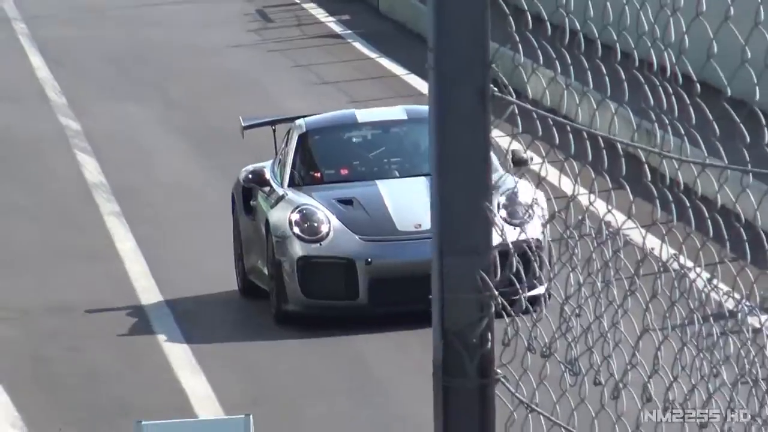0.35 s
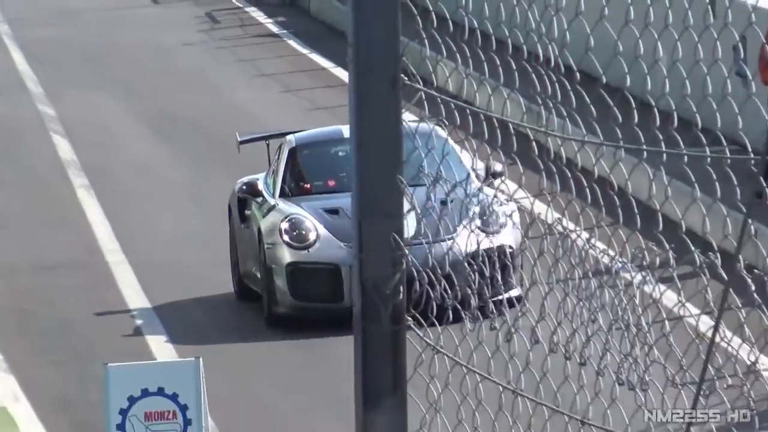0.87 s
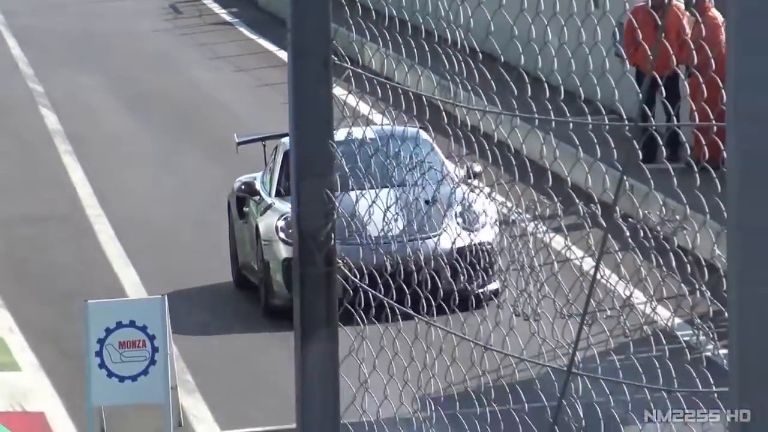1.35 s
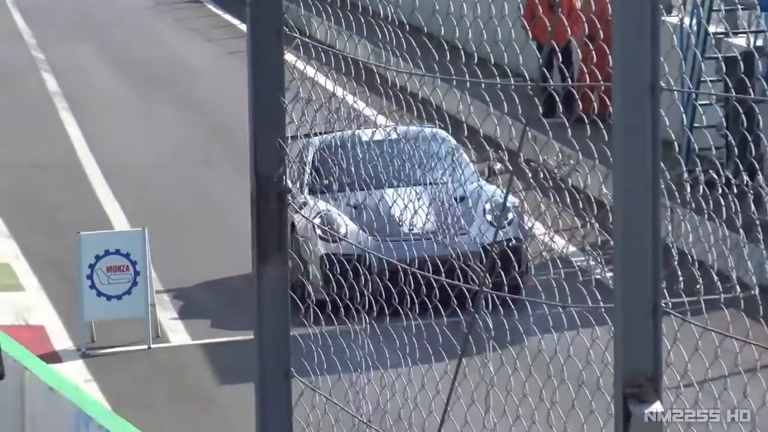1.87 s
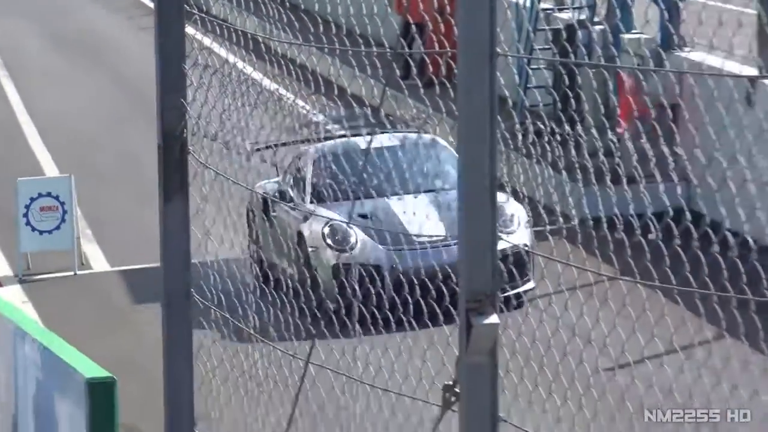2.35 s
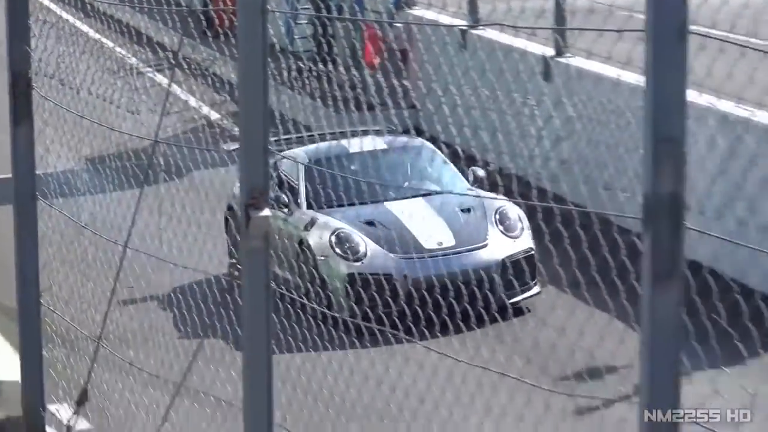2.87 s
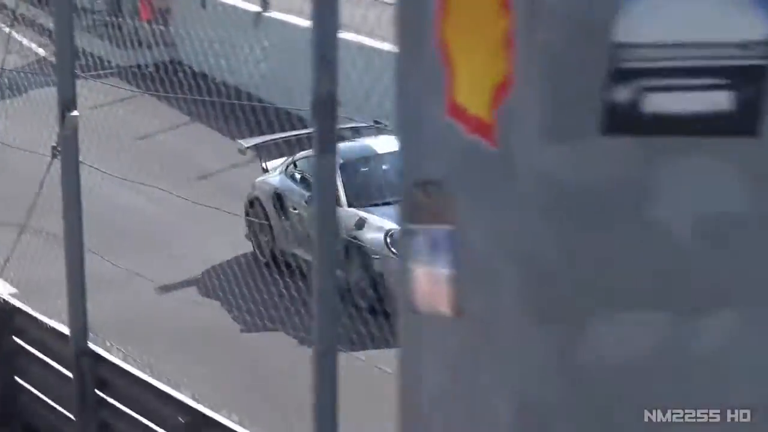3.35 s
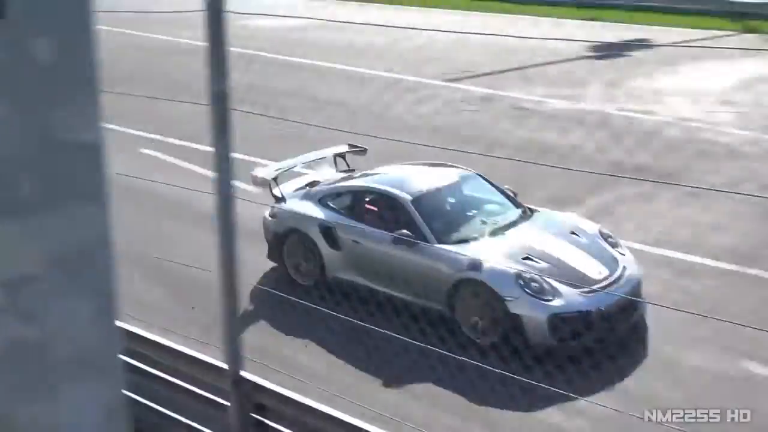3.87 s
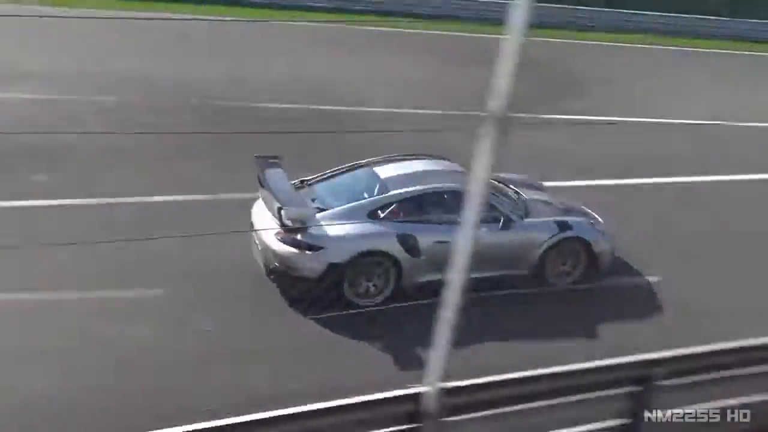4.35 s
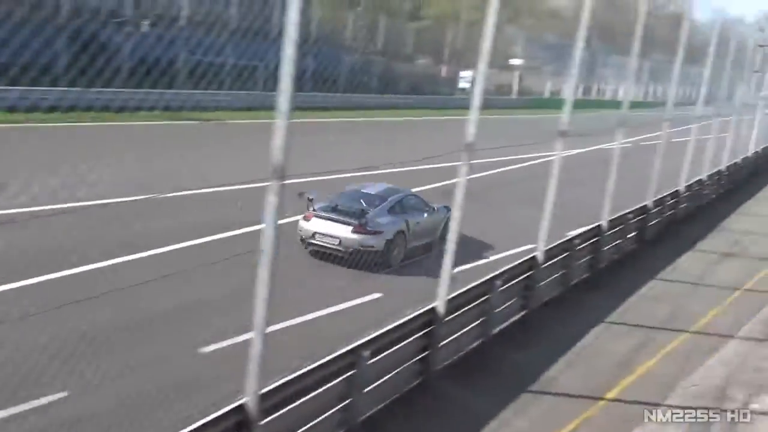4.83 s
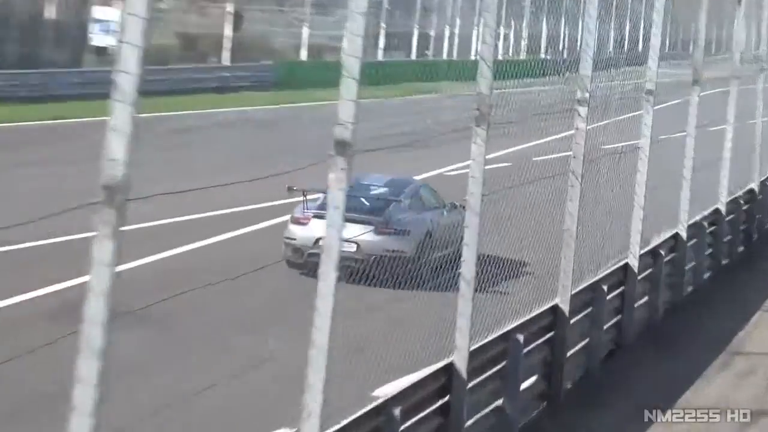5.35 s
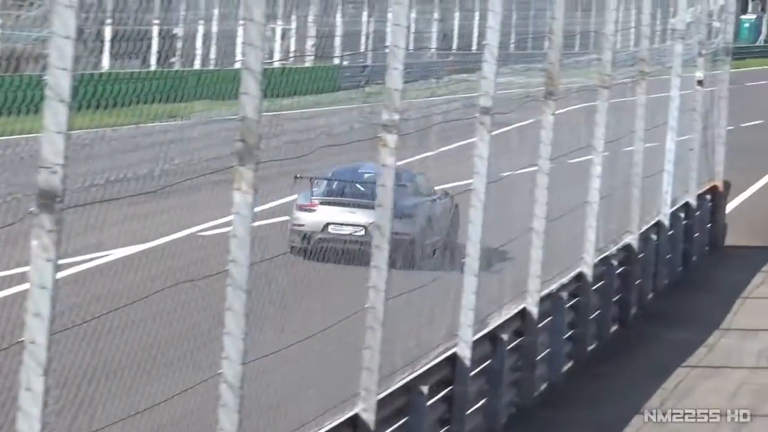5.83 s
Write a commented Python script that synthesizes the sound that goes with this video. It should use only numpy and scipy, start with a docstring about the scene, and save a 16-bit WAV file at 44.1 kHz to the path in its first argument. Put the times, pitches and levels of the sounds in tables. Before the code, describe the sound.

A turbocharged sports car nears along a walled pit lane, upshifts twice, crackles on the second shift, roars past close and pulls away.

```python
"""Another engine fades far off, amid faint ticks and a bed of track noise; light wind rumbles throughout.
A turbocharged six-cylinder car nears down a walled pit lane, shifts up and stumbles, then shifts again with pops.
It passes close by and pulls away. Its exhaust is a sum of engine-cycle orders, echoed by the walls;
gas growl, turbo hiss and tyre rush are shaped noise. All is heard at two close microphone ports."""
import sys
import numpy as np
from scipy import signal
from scipy.fft import rfft, irfft, next_fast_len
from scipy.io import wavfile
from scipy.ndimage import uniform_filter1d

SR = 44100
rng = np.random.default_rng(int(sys.argv[2]) if len(sys.argv) > 2 else 0)


def ratio_of_db(decibels):
    """Turn decibels (scalar or array-like) into linear amplitude factors; 0 dB maps to 1."""
    return 10 ** (np.asarray(decibels, float) / 20)


def wrap_up_sound(samples):
    """Save the sound to the file named by the first command line argument, as 16-bit audio."""
    columns = np.atleast_2d(samples).T
    # keep every value between -1 and 1, then stretch to whole-number steps
    tamed = np.clip(columns, -1, 1)
    steps = np.round(tamed * 32767).astype(np.int16)
    wavfile.write(sys.argv[1], SR, steps)


N = 263277

# One table a gear. Each row: time in seconds, engine cycles in Hz as heard.
GEARS = [
    [(0.0, 23.74), (0.65, 27.39), (0.838, 29.15), (1.106, 30.62), (1.43, 33.55), (1.714, 37.61),
     (1.93, 39.2)],
    [(2.01, 24.79), (2.478, 29.03), (3.142, 35.23), (3.838, 43), (3.865, 42.45)],
    [(3.93, 33.1), (3.955, 32.7), (4.14, 31.37), (4.25, 31.57), (4.65, 31.9), (5.2, 33.81), (5.97, 37.11)],
]
# Nearness of the gas noise. Each row: time in seconds, growl level in dB.
GAS = [(0, -54), (1.3, -52.5), (2.7, -44.5), (3.1, -40), (3.65, -33.5), (3.9, -32.5), (3.96, -29.5),
       (4.33, -24), (4.7, -27), (4.96, -30.5), (5.65, -35.5), (5.97, -35.5)]
# Share of rough burning heard: far, nose-on, side-on, tail-on.
UNEVEN = (.3, .07, .06, .1)
# Rough burning after the first shift: middle in seconds, half length in seconds, added share.
STUMBLE = (2.35, .25, .25)
# Rasp is full once the growl reaches RASP_NEAR_DB; the others are losses far off and from behind.
RASP_NEAR_DB, RASP_FAR_DB, RASP_REAR_DB = -36, -8, -7.5


def car():
    """Exhaust lines, pops and their wall echoes, with gas and tyre noise set by nearness and side."""
    t, hz, growl_db, seen = np.arange(N) / SR, columns(np.concatenate(GEARS))[0], columns(GAS)[0], aspect()
    cut = shifts()
    hiss_db = hiss_level(growl_db, seen)
    rasp_db = RASP_FAR_DB * np.clip((growl_db - RASP_NEAR_DB) / RASP_FAR_DB, 0, 1)
    rasp_db = rasp_db + RASP_REAR_DB * seen[3] ** 2
    middle, half, share = STUMBLE
    uneven = np.dot(UNEVEN, seen) + share * np.exp(-((t - middle) / half) ** 4)
    lines = exhaust(hz, loud_orders(hz, seen), growl_db + rasp_db, uneven + cut, seen)
    tones = lines * ratio_of_db(-13 * cut) + pops()
    # bank firings, three a cycle, plus chance
    throb = np.cos(2 * np.pi * 3 * np.cumsum(hz) / SR) + 0.46 * wander(hz=60, count=1)[0].real
    gas = growl(growl_db, throb) + hiss(hiss_db, throb) + fizz(hiss_db, throb)
    gusts = ratio_of_db(.75 * wander(hz=15, count=1)[0].real)  # swirls of air shake this noise together
    rush = gusts * (tyres(hiss_db) + gas)
    return tones + ratio_of_db(-15.5) * walls(tones) + burble(growl_db, seen, cut) + rush


LOUD_ORDERS = [3, 6, 9, 12, 15]  # orders of the engine cycle
# Uneven cylinders, re the smoothed sum of the loud orders.
# Each row: order, dB far, dB nose-on, dB side-on, dB tail-on.
LOW_ORDERS = [(5, -24, -19, -20, -30), (7, -15, -11, -14, -14), (8, -16, -14, -26, -20),
              (10, -21, -18, -23, -25), (11, -20, -23, -22, -30), (13, -25, -27, -23, -27),
              (14, -23, -27, -18, -31)]
# Rasp from order 16 up. Each entry: dB re growl, before the side and distance losses.
HIGH_ORDERS = [-15, -11, -9, -17, -8, -10, -17, -14, -11, -12, -13, -11, -17, -10, -17, -19, -10, -18, -13,
               -10, -16, -12, -14]
# The front of the body hides the rasp; these orders gain a little instead.
NOSE_ORDERS, NOSE_DULL_DB = [20, 21, 29], -5
SMEAR_TURNS = .3  # slip of alternate loud orders as pulses come round the body
CRACK_SHARE = .66  # side-on, rasp gathers by this share into one crack a cycle


def exhaust(hz, loud_db, growl_db, uneven, seen):
    """Cycle orders: bank pulses drawn out by the pipes, unlike cylinders between; rough burning blurs lines."""
    turns = np.cumsum(hz) / SR
    lead_db = uniform_filter1d(10 * np.log10(np.sum(ratio_of_db(2 * loud_db), axis=0)), size=6000)
    levels = list(zip(LOUD_ORDERS, loud_db))
    levels += [(k, lead_db + np.dot(db, seen) + flares(k)) for k, *db in LOW_ORDERS]
    for k, db in enumerate(HIGH_ORDERS, start=16):
        side = -.4 if k in NOSE_ORDERS else 1
        levels.append((k, growl_db + db + NOSE_DULL_DB * (seen[0] + seen[1]) * side))
    blur, chance = wander(hz=8, count=11), rng.random(41)
    out = np.zeros(N)
    for n, (k, db) in enumerate(levels):
        if n < len(LOUD_ORDERS):
            spread = uneven
            start = k * k / 170 + SMEAR_TURNS * seen[1] * (k % 2 == 0)
        else:
            spread = uneven + .28 + k / 280
            start = (chance[k] - .5) * (1 - CRACK_SHARE * seen[2] * (k > 15))
        blurred = (1 + spread * blur[n % 11]) / np.sqrt(1 + spread ** 2)
        line = blurred * np.exp(2j * np.pi * ((k * turns + start) % 1))
        out -= np.sqrt(2) * ratio_of_db(db) * line.real
    return out


# Exhaust note by throttle and distance. Each row: time in seconds, level in dB before colour and echo.
LOAD = [(0.0, -52.5), (0.65, -59), (1.0, -50), (1.35, -44), (1.6, -38), (1.9, -37.5), (2.15, -38),
        (2.52, -42.5), (2.7, -42), (3.0, -27.5), (3.4, -26), (3.85, -17.5), (4.1, -15.5), (4.4, -16),
        (4.65, -17), (4.9, -19), (5.15, -21), (5.97, -18)]
# Stumble and bite after the first shift. Each row: middle in seconds, half length in seconds, dB.
SURGES = [(2.9, .06, -1.5), (2.29, 0.012, -15), (2.66, 0.12, 5)]
# Colour of the loud orders. Each row: Hz, dB far up the lane, dB nose-on, dB side-on, dB tail-on.
TAILPIPES = [(72.4, -8, 7, -6, 3), (97.9, -18.5, -14.5, -2, -11.5), (124.2, -5, 4, -16.5, -35),
             (155, 4.5, -16.5, -17.5, -6), (184, 5.5, 0.5, -8, 10.5), (214.8, -2, 3.5, -15, 8.5),
             (277, 3, -12, 5, -28.5), (292, -7, 1.5, -1, 12.5), (339, -0.5, -8.5, -1, -5.5),
             (385, -15, -9.5, -0.7, -12), (472, -21, -6.5, -14.5, -18), (600.0, -26, -21, -20.5, -12)]
# One strong barrier echo that cancels some orders. Each row: time in seconds, extra path in metres.
ECHO_M = [(0.0, 0.65), (1.0, 0.92), (1.9, 1.67), (2.6, 1.23), (3.1, 0.984), (3.35, 0.52), (3.6, 1.19),
          (3.9, 0.73), (4.1, 0.89), (4.25, 0.76), (4.45, 1.04), (4.6, 0.78), (4.8, 0.75), (5.1, 0.63),
          (5.5, 0.77), (5.97, 0.96)]
ECHO_SHARE = 0.53


def loud_orders(hz, seen):
    """Level of each loud order: load, tailpipe colour from this side, and barrier echo interference."""
    f, *colours = np.transpose(TAILPIPES)
    lines = np.outer(LOUD_ORDERS, hz)
    colour_db = sum(share * np.interp(np.log(lines), np.log(f), db) for share, db in zip(seen, colours))
    echo = 1 + ECHO_SHARE * np.exp(2j * np.pi * lines * columns(ECHO_M)[0] / 343)  # sound at 343 m/s
    flares_db = [flares(k) for k in LOUD_ORDERS]
    return columns(LOAD)[0] + swells(SURGES) + flares_db + colour_db + 20 * np.log10(abs(echo))


# Each row: middle in seconds, half length in seconds, order, dB.
FLARES = [(1.01, 0.057, 9, 6.5), (1.28, 0.25, 8, 11), (1.705, 0.45, 3, -5), (1.794, .15, 9, 3.5),
          (2.088, 0.054, 6, -9), (2.12, 0.029, 9, 8.5), (2.493, 0.054, 6, 5.5), (2.532, 0.054, 9, -14.5),
          (2.637, 0.25, 8, 14), (2.728, 0.29, 6, -5.5), (2.758, 0.14, 9, 5.5), (3.194, 0.085, 9, 3.5),
          (3.44, 0.089, 6, -2.5), (3.452, 0.11, 9, -6.5), (4.273, 0.062, 15, 10), (4.528, 0.062, 6, -11),
          (5.123, 0.11, 15, -10), (5.104, 0.41, 13, 13), (5.617, 0.16, 3, 11.5)]


def flares(k):
    """Passing rises and dips of order k, in dB."""
    return swells([(s, half, db) for s, half, order, db in FLARES if order == k]) + np.zeros(N)


# Each row: start in seconds, swing peak in dB, swing in Hz.
POPS = [(3.8708, -7.5, 286), (3.886, -12, 480), (3.8963, -9, 288), (3.9125, -13, 500), (3.9245, -6.5, 300)]


def pops():
    """Unburnt charge bangs in the pipe: a short swing, with a low thump."""
    out, t = np.zeros(N + 4000), np.arange(4000) / SR
    thump = np.roll(np.sin(2 * np.pi * 100 * t) * signal.windows.hann(4000) ** 8, -1500)
    for s, db, hz in POPS:
        swing = np.sin(2 * np.pi * hz * t) * t ** 2 * np.exp(-t / 0.0012)
        out[round(s * SR):][:4000] += ratio_of_db(db) * (swing / abs(swing).max() + 0.092 * thump)
    return out[:N]


def shifts():
    """1 while torque is cut between two gears, else 0, with smoothed edges."""
    t, cut = np.arange(N) / SR, np.zeros(N)
    for old, new in zip(GEARS, GEARS[1:]):
        cut += (t > old[-1][0]) & (t < new[0][0])
    return uniform_filter1d(cut, size=1100)


NEAR_S, NEARING_S, PASS_S, TURN_S = 2.64, 0.97, 4.417, 0.43  # draws near, then turns nose-on to tail-on


def aspect():
    """Shares of the car heard far off, nose-on, side-on and tail-on as it passes."""
    t = np.arange(N) / SR
    turn, near = np.tanh((t - PASS_S) / TURN_S), .5 + .5 * np.tanh((t - NEAR_S) / NEARING_S)
    front = np.maximum(-turn, 0)
    return np.array([front * (1 - near), front * near, 1 - abs(turn), np.maximum(turn, 0)])


def walls(x):
    """Sparse echoes from pit wall and barriers, different at each port, decaying 60 dB in 1.2 s."""
    taps, slots = np.zeros((2, SR // 2)), np.arange(300, SR // 2 - 40, 40)
    at = slots + rng.integers(0, 40, (2, len(slots)))
    np.put_along_axis(taps, at, rng.choice([-1., 1.], at.shape), 1)
    taps = taps * ratio_of_db(-60 * np.arange(SR // 2) / SR / 1.2)
    return signal.fftconvolve(x[None], taps / np.linalg.norm(taps[0]), axes=1)[:, :N]


# Each row: Hz, dB per Hz.
BURBLE = [(50, -5.5), (110, 2), (200, 5.5), (330, 4.5), (500, 0), (750, -47)]
# dB re growl: far, nose-on, side-on, tail-on.
BURBLE_DB = (4, 0, -5, -4)
BURBLE_RISE_S, IDLE_DB, RAGGED_DB = 0.92, -21.5, 13  # fills in as throttle opens; boost while fire is cut


def burble(growl_db, seen, cut):
    """Low exhaust noise, raised while the fire is cut."""
    rise_db = IDLE_DB * np.maximum(1 - np.arange(N) / SR / BURBLE_RISE_S, 0)
    level_db = growl_db + np.dot(BURBLE_DB, seen) + rise_db + RAGGED_DB * cut
    return ratio_of_db(level_db) * noise(BURBLE, like=1.0, patchy_db=0.5)


# Each row: Hz, dB per Hz.
GROWL = [(250, -11.5), (500, 5), (900, 0), (1500, -3), (2400, -17.5), (3500, -37)]


def growl(growl_db, throb):
    """Gas noise that throbs with each bank's firing."""
    return ratio_of_db(growl_db - 1.0) * noise(GROWL, like=0.99, patchy_db=0.95) * (1 + 0.18 * throb)


# dB re growl, before trim: far, nose-on, side-on, tail-on.
HISS_DB = (-12.5, -9.5, -6, -1.5)
# Swishes past gaps in the fence. Each row: middle in seconds, half length in seconds, dB.
SWISHES = [(4.62, 0.029, 3), (4.75, 0.026, 2.5)]
HISS_FADE_S, HISS_FADE_DB_PER_S = 4.425, -6.5  # air dulls it as the car leaves
SCREEN_S, SCREEN_DB = 3.988, -5.5  # post and fence screen the nose-on treble until it clears them


def hiss_level(growl_db, seen):
    """Level of the hiss in dB, before trim: nearness, side, air loss, fence gaps and screening."""
    t = np.arange(N) / SR
    level_db = growl_db + np.dot(HISS_DB, seen) + HISS_FADE_DB_PER_S * np.maximum(t - HISS_FADE_S, 0)
    return level_db + swells(SWISHES) + SCREEN_DB * seen[1] * np.clip((SCREEN_S - t) / 0.26, 0, 1)


# Each row: Hz, dB per Hz.
HISS = [(1200, -13), (2000, -3.5), (4100, -5.5), (5600, -10.5), (7200, -16), (9000, -37)]


def hiss(hiss_db, throb):
    """Turbo and tyre hiss, throbbing with the firing."""
    return ratio_of_db(hiss_db + 2.5) * noise(HISS, like=1.0, patchy_db=1.4) * (1 + 0.25 * throb)


# Each row: Hz, dB per Hz.
FIZZ = [(5000, -35.5), (7000, 6), (8800, 4.5), (10300, -32), (12700, 3), (15500, -12)]


def fizz(hiss_db, throb):
    """Top treble; air eats it with distance, so its level moves more than the hiss."""
    return ratio_of_db(1.254 * hiss_db) * noise(FIZZ, like=0.79, patchy_db=2.0) * (1 + 0.15 * throb)


# Each row: Hz, dB per Hz.
TYRES = [(600, -12.5), (1100, -4), (1750, 1.5), (2300, -2), (3200, -28.5)]
# Swell between the lane walls: middle in seconds, half length in seconds, dB.
LANE = (2.15, 0.63, 3.6)
TYRES_DB, TYRES_SHARE = -38, 0.57  # level at the loudest hiss, before the swell; share of the hiss's fall


def tyres(hiss_db):
    """Rush of the front tyres, spread along the lane, so it fades less than the hiss."""
    level_db = TYRES_DB + TYRES_SHARE * (hiss_db - hiss_db.max()) + swells([LANE])
    return ratio_of_db(level_db) * noise(TYRES, like=1, patchy_db=2.0)


# Each row: time in seconds, Hz, dB.
FAR_ENGINE = [(0.0, 347.2, -52), (0.476, 314.1, -58.5), (0.6, 338, -82)]


def far_engine():
    """One wavering note of another car sinking away."""
    hz, db = columns(FAR_ENGINE + [(FAR_ENGINE[-1][0] + 0.11, 310, -85)])
    waver = 1 + 0.31 * wander(hz=13, count=1)[0]
    return np.sqrt(2) * ratio_of_db(db) * (waver * np.exp(2j * np.pi * np.cumsum(hz) / SR)).real


# Each row: start in seconds, peak in dB, left over right in dB, both before the ports' own colour.
TICKS = [(0.2184, -49, 3.5), (0.4206, -44, 6), (0.5594, -45.5, 4)]


def ticks():
    """Faint ticks close by: short bright puffs of noise."""
    out, t = np.zeros((2, N)), np.arange(900) / SR
    for s, db, pan_db in TICKS:
        puff = uniform_filter1d(rng.standard_normal(900), size=4)
        puff = signal.lfilter([1, -1], [1, -.75], puff)
        puff = puff * np.minimum(t / .004, 1) * np.exp(-t / 0.0099)
        port_db = db + pan_db * np.array([[.5], [-.5]])
        out[:, round(s * SR):][:, :900] += ratio_of_db(port_db) * puff / abs(puff).max()
    return out


# Each row: Hz, dB per Hz.
TRACK = [(41, -46.5), (70, -14), (154, -13), (271, -3), (333, -4.5), (585, -10.5), (1500, -19),
         (2100, -24.5), (2700, -21.5), (5500, -26), (13200, -37.5), (15500, -64)]


def track():
    """Steady, patchy bed of track noise, partly its own at each port."""
    return ratio_of_db(-52) * noise(TRACK, like=0.52, patchy_db=2.7)


# Each row: middle in seconds, half length in seconds, dB.
GUSTS = [(1.75, 0.72, 11), (2.9, .1, 14), (3.66, 0.055, 5), (5.0, 0.073, 12)]
WIND_DB, WIND_SWING_DB = -58.5, 3  # level between gusts; rms swing


def wind():
    """Lumpy 10-44 Hz rumble, partly its own at each port."""
    z = rng.standard_normal((3, N))
    band = signal.butter(3, [10, 44], "bandpass", fs=SR, output="sos")
    low = signal.sosfilt(band, z[:2] + .4 * z[2])
    return ratio_of_db(WIND_DB + swells(GUSTS) + WIND_SWING_DB * wander(hz=3, count=1)[0].real) * evened(low)


# Likeness of the ports. Each row: Hz, coherence from 0 to 1.
LIKE = [(100, 0.93), (500, 0.91), (1400, 0.88), (3000, 0.92), (7000, 0.92), (15000, 1)]


def noise(spectrum, like, patchy_db):
    """Two-port noise of rms 1 with drifting patches in time and pitch."""
    hz = np.fft.rfftfreq(1024, 1 / SR)
    a, b, c, d, patches = rng.standard_normal((N // 256 + 5, 513, 5)).T
    patches = evened(uniform_filter1d(uniform_filter1d(patches, size=14, axis=0), size=8, axis=1))
    same, left = np.clip(like * read(LIKE, hz), 0, 1)[:, None], a + 1j * b
    z = np.array([left, same * left + np.sqrt(1 - same ** 2) * (c + 1j * d)])
    z *= ratio_of_db(read(spectrum, hz)[:, None] + patchy_db * patches)
    return evened(signal.istft(z, nperseg=1024, noverlap=768)[1][:, :N])


def wander(hz, count):
    """Slow complex chance of rms about 1, one row a user, changing about hz times a second."""
    z = rng.standard_normal((2, count, N // 64 + 2))
    z = signal.sosfilt(signal.butter(2, hz, fs=SR / 64, output="sos"), z[0] + 1j * z[1])
    z = np.repeat(z / np.std(z), 64, axis=1)[:, :N]
    return uniform_filter1d(z.real, size=64, axis=1) + 1j * uniform_filter1d(z.imag, size=64, axis=1)


def swells(rows):
    """Sum of bell-shaped rises or dips."""
    return sum(top * np.exp(-((np.arange(N) / SR - s) / half) ** 2) for s, half, top in rows)


def columns(rows):
    """Each column of a table as a curve over all samples."""
    s, *values = np.transpose(rows)
    return [np.interp(np.arange(N) / SR, s, v) for v in values]


def read(points, hz):
    """A table's value at hz, interpolated over log frequency."""
    f, value = np.transpose(points)
    return np.interp(np.log(hz + 1), np.log(f + 1), value)


def evened(x):
    """Scaled to rms 1."""
    return x / np.sqrt(np.mean(x ** 2) + 1e-20)


def scene():
    """Everything at the two ports."""
    return car() + far_engine() + ticks() + track() + wind()


def band_limit(x):
    """A steep low-pass at the top of the band."""
    return signal.sosfilt(signal.butter(12, 15610, fs=SR, output="sos"), x)


# Left port over right. Each row: Hz, level in dB.
LEFT = [(60, .2), (950, 0.49), (4000, .3), (15000, 0.68)]
# Left port over right. Each row: Hz, phase lead in radians.
LEAD = [(0, 0), (4220, 1.0), (6120, 2), (7240, 3), (15200, 3.5)]


def record(dry):
    """The left port hears the treble earlier and a little louder; loud peaks round off."""
    size = next_fast_len(N + 512)
    hz = np.fft.rfftfreq(size, 1 / SR)
    half = ratio_of_db(read(LEFT, hz) / 2) * np.exp(.5j * np.interp(hz, *np.transpose(LEAD)))
    ports = irfft(rfft(dry, size) * np.array([half, 1 / half]), size)[:, :N]
    return band_limit(2 * np.tanh(ports / 2))


dry = scene()
out = record(dry)
wrap_up_sound(out)
```